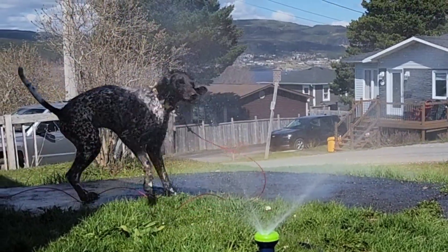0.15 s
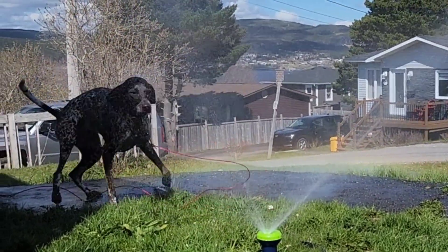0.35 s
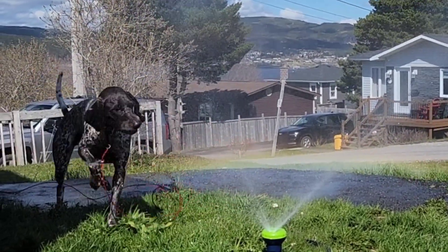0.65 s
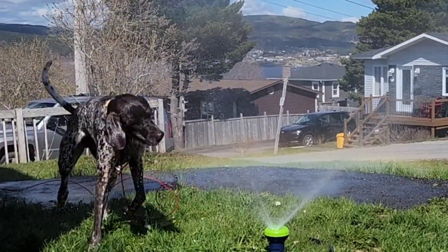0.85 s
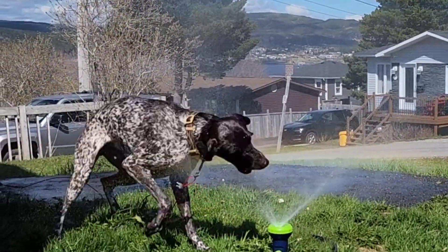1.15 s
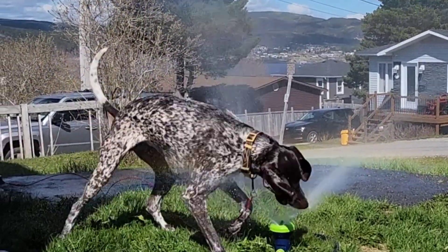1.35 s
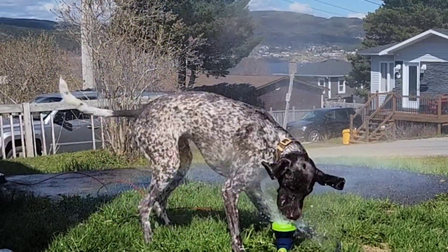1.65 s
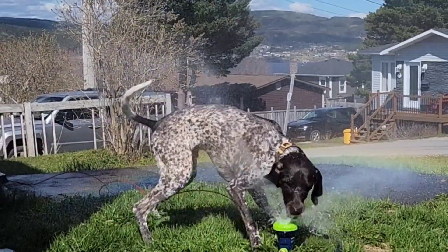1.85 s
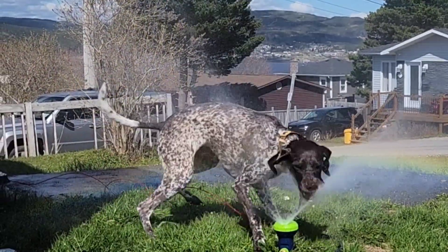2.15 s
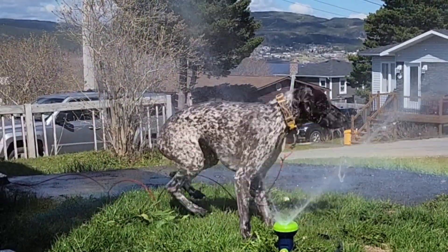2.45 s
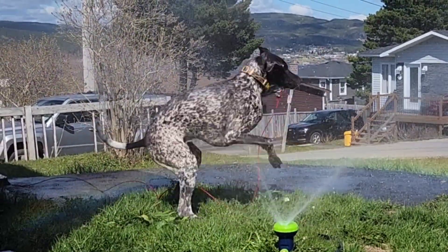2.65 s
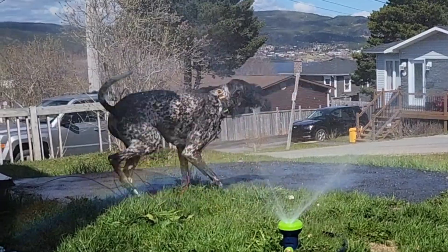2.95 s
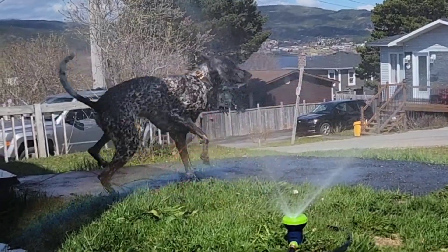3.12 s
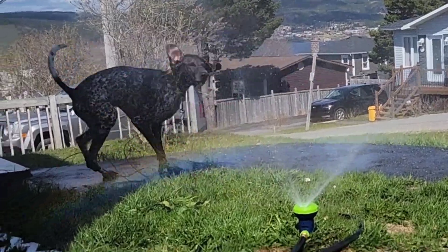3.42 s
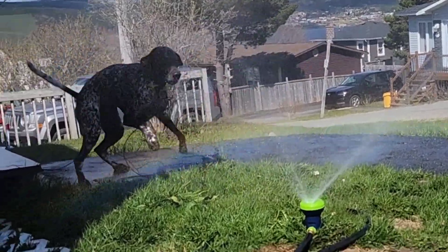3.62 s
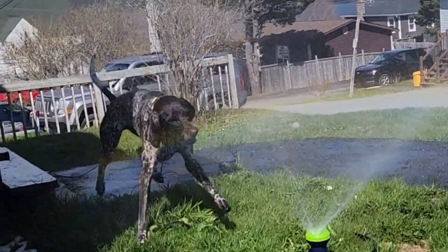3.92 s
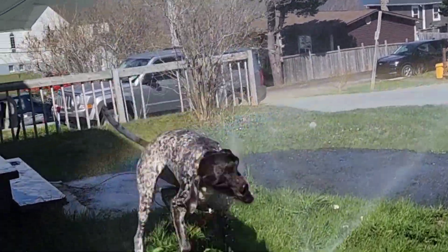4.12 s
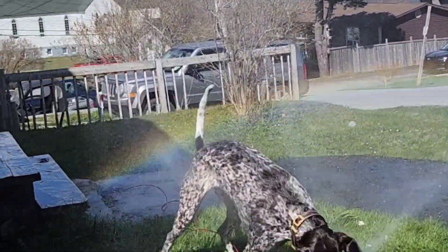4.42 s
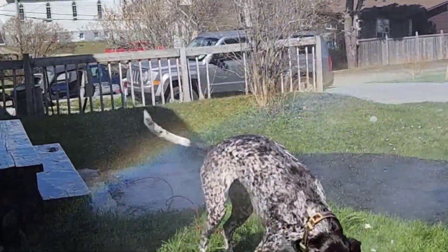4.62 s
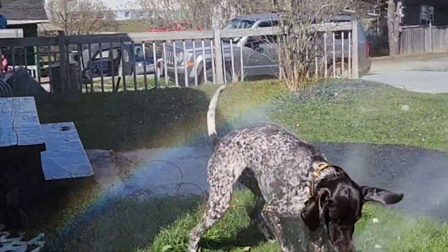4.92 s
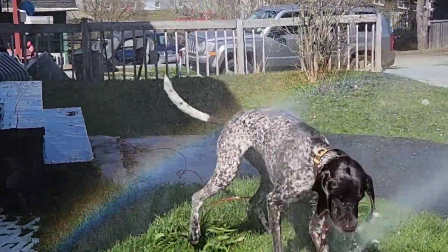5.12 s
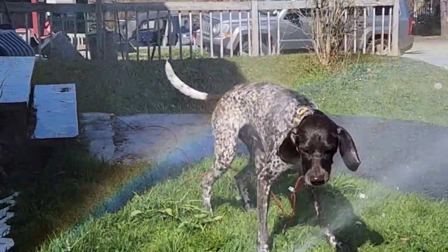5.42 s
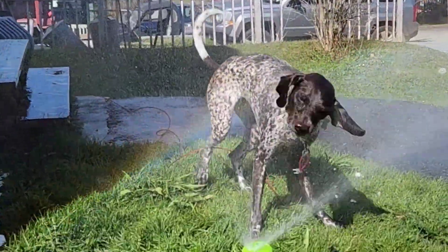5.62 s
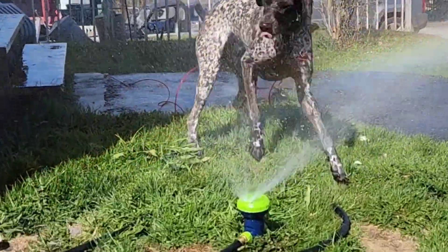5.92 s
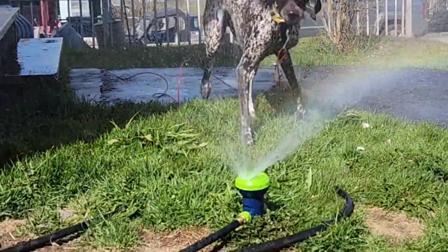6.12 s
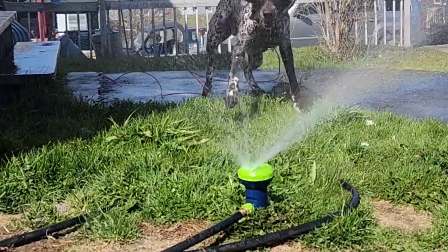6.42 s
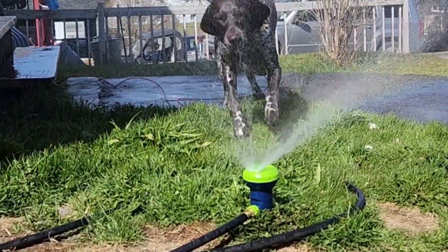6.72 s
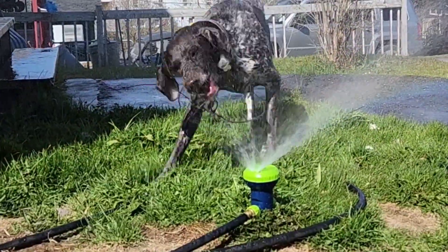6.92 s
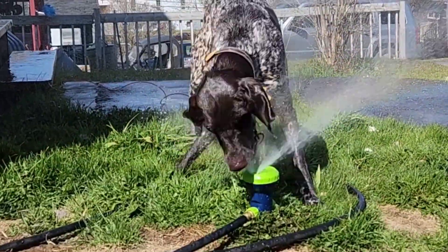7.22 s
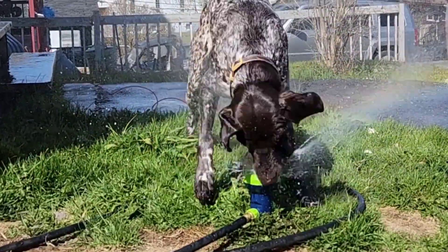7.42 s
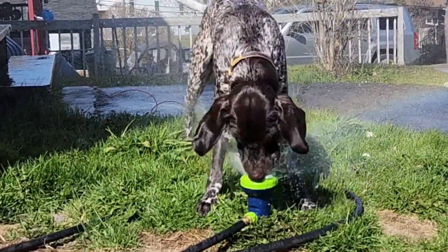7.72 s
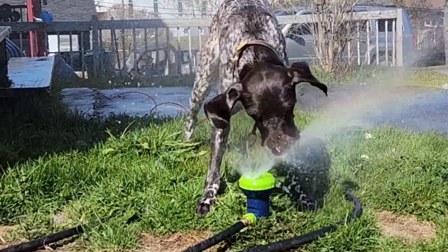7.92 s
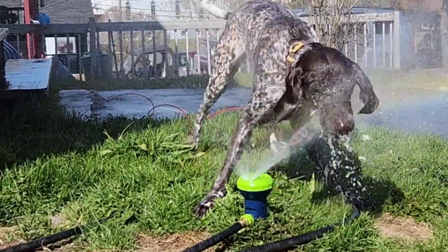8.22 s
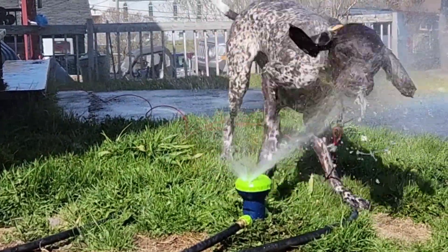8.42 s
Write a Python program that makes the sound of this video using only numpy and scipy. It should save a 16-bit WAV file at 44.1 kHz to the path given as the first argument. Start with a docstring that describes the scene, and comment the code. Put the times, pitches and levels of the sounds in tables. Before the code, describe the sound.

Steady sprinkler spray flares into splatters as a dog snaps and bites at the water, over low gusts of wind.

```python
"""On a lawn, a hand-held camera with two microphone ports stands back from a hissing sprinkler, wind
buffeting the ports. A dog snorts, then chomps at the jet, which splatters on its muzzle and fur.
Around five seconds in the camera turns and comes close, and the short echoes off the ground and the
holding hand shift. A bird chirps once to the left, just before the dog's last bout of wet bites."""
import sys
import numpy as np
from scipy import signal
from scipy.fft import rfft, irfft, next_fast_len
from scipy.io import wavfile
from scipy.ndimage import uniform_filter1d, map_coordinates

SR = 44100
rng = np.random.default_rng(int(sys.argv[2]) if len(sys.argv) > 2 else 0)


def to_wav(s):
    """Save 16-bit WAV."""
    ch = np.atleast_2d(s).T  # columns
    pcm = np.round(np.clip(ch, -1, 1) * 32767)  # PCM
    wavfile.write(sys.argv[1], SR, pcm.astype(np.int16))


N = 377496

# The steady jet. Each row: time in seconds, mist in dB, splatter in dB.
JET = [(0, -35.5, -67), (1.1, -36, -49), (1.32, -35, -44), (1.41, -32.5, -47), (1.8, -32, -42.5),
       (2.2, -34, -45), (2.6, -35.5, -56), (3.6, -36, -48.5), (4.4, -35.5, -44), (5.0, -33.5, -43.5),
       (5.25, -32, -40.5), (5.55, -33, -45.5), (6.1, -33.5, -47), (6.6, -33.5, -46), (7.05, -33, -46.5),
       (7.3, -32.5, -41.5), (7.95, -33.5, -39.5), (8.2, -30, -39.5), (8.56, -31.5, -40)]
# The jet bursts on fur. Each row: peak, rise and fall in seconds, mist in dB, splatter in dB.
SPURTS = [(0.74, 0.033, 0.077, -41, -43), (1.55, 0.11, 0.06, -38, -46), (1.69, 0.025, 0.055, -27.5, -43),
          (1.86, 0.01, 0.013, -30, -44), (2.075, 0.043, 0.028, -28, -39), (2.22, .03, 0.029, -53, -43.5),
          (2.36, 0.023, 0.1, -44, -42.5), (3.36, 0.11, 0.098, -47, -40), (4.11, 0.031, 0.018, -47, -40),
          (4.51, 0.041, 0.058, -35, -49), (4.68, 0.015, 0.021, -31, -37), (4.732, 0.012, 0.016, -30, -36),
          (4.77, 0.046, 0.083, -29, -35.5), (6.25, 0.075, 0.013, -57, -42), (7.15, .03, 0.082, -36, -36),
          (7.41, 0.053, 0.016, -31.5, -38.5), (7.58, 0.11, 0.074, -28.5, -34.5),
          (7.75, 0.017, 0.018, -47, -35.5), (7.83, 0.049, 0.074, -30.5, -34.5),
          (8.34, 0.015, 0.06, -39, -50)]
# The camera's path. Each row: time in seconds, nearness 0-1, then the ground echo's delay in ms
# and its strength, for the left port and for the right.
CAMERA = [(0, 0, 2.18, .28, 2.16, .25), (3.2, 0, 2.18, .28, 2.16, .25), (3.6, .05, 2.25, .2, 2.0, .3),
          (4.6, .2, 1.6, .12, 1.35, .3), (5.1, .3, 1.3, .1, 1.14, .2), (5.3, .92, 1.14, .12, 1.1, .2),
          (5.6, .95, 1.05, .15, 1.15, .2), (5.8, .95, 1.02, .2, 1.44, .45), (6.4, .95, .8, -.2, 1.35, .3),
          (8.56, .95, .8, -.25, 1.41, .35)]


def mist():
    """Fine mist hisses from the nozzle and flares as the jet bursts on the dog."""
    # Colour at each port, from afar and close up. Each row: frequency in Hz, relative level in dB.
    far_left = [(1300, -10), (2200, -7), (3200, -1), (4500, 5), (5300, -1.5), (6300, 1), (6900, 1),
                (7400, 4.5), (8000, 1), (8600, 2.5), (9600, 0.8), (11000, -0.5), (12200, -0.5),
                (13200, -0.5), (14200, -2), (15500, 0)]
    far_right = [(1300, -4.5), (2200, -9.5), (3200, -8.5), (4500, 1), (5300, 0), (6500, 0), (7600, 5),
                 (8600, -5), (9600, -6), (11000, -4), (12200, 0), (13200, -8), (14200, -3), (15500, -4)]
    near_left = [(1000, -12.5), (1900, -4.5), (2400, 5), (3200, -4), (4500, 3), (5300, -0.5), (6500, 7.5),
                 (7600, 4.5), (8600, 4), (9600, 2.5), (11000, 3.5), (11900, 5), (12600, 9), (13600, 3),
                 (14200, 5), (15500, 3.5)]
    near_right = [(1000, -5), (1500, -9), (2000, -22), (2500, -2), (3200, -1.5), (4500, 5), (5300, 3.5),
                  (6500, 0), (7600, 6.5), (8600, 0), (9600, -7), (11000, -6), (12200, 1.5), (13200, -8),
                  (14200, -4), (15500, -3)]

    def colour(hz, near):
        return np.array([(1 - near) * along([(500, -27)] + far, hz)
                         + near * along([(500, -22)] + close, hz)
                         for far, close in ((far_left, near_left), (far_right, near_right))])

    gain = bursts(curves(JET)[0], [row[:4] for row in SPURTS])
    hiss = water_at_ports(colour, depth_db=1.23, rate=900, patchy_db=1.36)
    return hiss * gain * amp(.62 * wobble(5.3))


def splatter():
    """Coarse drops hit fur, lower than the mist and leaning left as the camera nears."""
    # Each row: frequency in Hz, relative level in dB.
    spectrum = [(1100, -57), (1600, -6.5), (2300, 4), (3500, 7), (5500, 0.5), (9000, -47)]
    colour = lambda hz, near: along(spectrum, hz) + np.array([1.6 * near, -2.5 * near])[:, None]
    gain = bursts(curves(JET)[1] + 1.5 * wobble(14), [(*row[:3], row[4]) for row in SPURTS])
    return water_at_ports(colour, depth_db=2.8, rate=350, patchy_db=2.2) * gain


def patter():
    """The rest of the water falls softly on the grass."""
    # Each row: time in seconds, level in dB.
    levels = [(0.0, -51.5), (0.86, -46), (1.3, -47.5), (1.98, -43.5), (2.8, -49), (3.2, -47.5),
              (3.43, -43.5), (3.72, -49.5), (5.2, -48.5), (6.5, -48.5), (7.02, -47), (7.18, -39.5),
              (7.37, -44.5), (8.3, -45), (8.56, -46)]
    # Drops on grass, from afar and close up. Each row: frequency in Hz, relative level in dB.
    grass_far = [(120, -30), (200, -12.5), (640, -4.5), (807, -7.5), (1010, -8), (1180, -13.5), (1490, -8),
                 (2500, -44), (3250, -54), (5500, -120)]
    grass_near = [(120, -22), (200, -10.5), (540, -5.5), (780, -1), (990, -16.5), (1200, -0.5), (2000, -4),
                  (2800, -40)]
    colour = lambda hz, near: (1 - near) * along(grass_far, hz) + near * along(grass_near, hz)
    gain = amp(curves(levels)[0] + 1.07 * wobble(9))
    return water_at_ports(colour, depth_db=2, rate=150, patchy_db=1) * gain


def snorts():
    """Air blasts through the dog's nose and throat, then drops to a weaker tail."""
    # Each row: start, blast and tail in seconds, level in dB, left over right in dB.
    breaths = [(0.703, 0.056, 0.06, -32.5, -3), (3.22, .14, .1, -44.5, -11), (6.205, 0.0093, .02, -39, 2)]
    # One set of resonances a snort. Each row: centre in Hz, width in Hz, level in dB.
    snouts = [
        [(1060, 80, 0.5), (1675, 220, 2.5), (2160, 160, 1), (2710, 170, -3), (3430, 240, -14), (615, 220, -13)],
        [(517, 300, -6), (1010, 460, 0), (1700, 970, -3.5), (2520, 340, 4), (3550, 1200, -8)],
        [(710, 190, -3.5), (1700, 640, -5), (2600, 730, -14)],
    ]
    attack_s, drop_s, release_s = .013, .006, .06
    out = np.zeros((2, N))
    for (s, blast, tail, db, pan_db), snout in zip(breaths, snouts):
        times = s + np.cumsum([0, attack_s, blast, drop_s, tail, release_s])
        envelope = list(zip(times, db - np.array([30, 0, 0, 6, 10.5, 30])))
        air = unit(filtered(drops(1.9, 180), resonances(snout)))
        side = .4 * unit(filtered(drops(3.7, 210), resonances(snout)))
        pair = np.array([air + side, np.roll(air, 4) - side])
        out += panned(pair * amp(curves(envelope)[0]) * gate(envelope), pan_db)
    return out


def gargles():
    """The jet sounds the open mouth; the spray shakes the tone's strength and pitch."""
    # Each row: peak, rise and fall in seconds, level in dB, cavity pitch in Hz.
    mouthfuls = [(4.21, 0.1, 0.1, -51, 840), (4.58, 0.07, 0.058, -46.5, 779), (7.24, 0.07, 0.08, -41, 850),
                 (7.51, 0.055, 0.035, -39, 820)]
    closing = .2  # share of the pitch lost with the mouth nearly shut
    out = np.zeros(N)
    for s, rise, fall, db, hz in mouthfuls:
        shake = .2 + 1.4 * wobble(150)
        opening = swell(s, rise, fall)
        pitch = hz * (1 - closing * (1 - opening)) + 60 * wobble(60)
        out += shake * np.sin(phase(pitch)) * amp(db) * opening
    return out


def chomps():
    """Each wet bite is a squelch that rings the mouth and, more faintly, the muzzle."""
    # Each row: start in seconds, peak in dB, mouth resonance in Hz, left over right in dB.
    bites = [(1.612, -31.5, 700, 5), (1.637, -32, 810, 0), (1.841, -29.5, 674, 0), (1.858, -32.5, 800, 8),
             (1.98, -32, 516, 5), (2.003, -39, 600, 3), (2.081, -46, 630, -1), (2.349, -34, 430, 3),
             (2.363, -35, 480, 3), (2.382, -33, 470, 3), (2.981, -41, 624, -5), (4.326, -35.5, 680, 3),
             (4.54, -38.5, 680, 0), (4.712, -38.5, 480, 0), (5.776, -35, 780, 0), (7.216, -32, 776, 4),
             (7.781, -29.5, 370, 4), (8.02, -37, 656, 1)]
    # The muzzle's resonances. Each row: centre in Hz, width in Hz, relative level in dB.
    muzzle = [(1550, 300, 6), (2400, 500, -6)]
    fall_s = .058  # to die by 30 dB
    out, t = np.zeros((2, N)), np.arange(SR // 6) / SR
    for s, db, hz, pan_db in bites:
        squelch = rng.standard_normal(len(t)) * (1 - np.exp(-t / .003)) * amp(-30 * t / fall_s)
        mouth = resonances([(hz, .95 * hz, 0)])
        wet = filtered(squelch, lambda f: mouth(f) ** 2 + amp(-17) * resonances(muzzle)(f))
        add_at(out, s, panned(wet / np.abs(wet).max() * amp(db), pan_db))
    return out


def ticks():
    """Teeth and drops click sharply: four partials and noise through one broad resonance."""
    # Each row: start in seconds, peak in dB, resonance in Hz, left over right in dB.
    clicks = [(0.393, -42, 1900, -1), (3.82, -31, 2700, -5), (4.0935, -25, 2000, -3), (4.919, -33, 2000, 0),
              (8.4565, -21, 2400, 5)]
    fall_s = .011  # to die by 60 dB
    out, t = np.zeros((2, N)), np.arange(SR // 6) / SR
    for s, db, hz, pan_db in clicks:
        partials = sum(np.sin(2 * np.pi * k * hz * t) for k in (.25, .55, 1, 1.6))
        envelope = (1 - np.exp(-t / .001)) * amp(-60 * t / fall_s)
        crack = (partials + 1.2 * rng.standard_normal(len(t))) * envelope
        tick = filtered(crack, resonances([(hz, 1.3 * hz, 0)]))
        add_at(out, s, panned(tick / np.abs(tick).max() * amp(db), pan_db))
    return out


def pops():
    """Wet pops in the mouth and on the muzzle ring briefly, reaching the right port a little later."""
    # Each row: start in seconds, peak in dB, pitch in Hz, length in cycles, left over right in dB.
    rings = [(1.609, -24.5, 426, 2, 2), (1.616, -30, 930, 7.3, -1), (1.627, -37, 810, 5, 11),
             (1.809, -35, 625, 8.3, 0), (1.858, -35, 700, 6, 4), (1.883, -35, 660, 7, 0),
             (1.977, -31, 660, 2.7, 0), (1.978, -31, 1520, 8.4, 0), (1.985, -31.5, 1560, 13, -2),
             (1.987, -39, 790, 5, 0), (2.095, -30.5, 410, 3, 2), (2.127, -37, 471, 4, 1),
             (7.134, -34, 2300, 9, 5), (7.152, -36, 1830, 13, 3), (7.156, -30, 2730, 11, 1),
             (7.178, -36, 2300, 12, 3), (7.227, -33.5, 2150, 19, 8), (7.343, -39, 2750, 9.1, 1.5),
             (7.557, -29, 4240, 14, 1), (7.726, -35, 2500, 28, 4), (7.741, -29, 2340, 12, 3),
             (7.751, -34, 2000, 13, 3), (7.81, -25, 3730, 13, 0), (7.831, -26, 3580, 12, 2)]
    out = np.zeros((2, N))
    for s, db, hz, cycles, pan_db in rings:
        turns = np.arange(round(cycles / hz * SR)) * hz / SR
        envelope = amp(db) * np.sin(np.pi * (turns / cycles) ** .76)
        glide = 1 + .025 * rng.standard_normal() * turns / cycles
        left, right = panned(envelope * np.sin(2 * np.pi * turns * glide), pan_db)
        add_at(out[0], s, left)
        add_at(out[1], s + 3 / SR, right)
    return out


def wind():
    """Eddies at the ports: a deep rumble, mostly shared, and a lighter flap that differs more."""
    # Each row: time in seconds, rumble in dB, flap in dB.
    breeze = [(0, -46, -45.5), (.7, -43.5, -54), (1.5, -45.5, -55), (2.0, -39.5, -58), (2.6, -39.5, -50.5),
              (3.2, -44.5, -61), (3.9, -41, -65), (4.5, -44.5, -56.5), (5.3, -38.5, -50.5),
              (6.2, -44, -52.5), (7.2, -42.5, -59.5), (7.7, -46, -50.5), (8.56, -41.5, -47)]
    # Each row: peak and width in seconds, rumble in dB, flap in dB.
    gusts = [(0.05, 0.059, -38, -38.5), (0.19, 0.049, -37, -43.5), (0.45, 0.11, -39, -61),
             (0.98, 0.037, -42, -41.5), (1.15, 0.063, -39, -45), (1.58, 0.046, -54, -38),
             (1.79, 0.084, -42.5, -39.5), (1.96, 0.064, -38.5, -42), (2.1, 0.037, -43, -43),
             (2.39, 0.057, -38, -44.5), (2.7, 0.034, -36, -43), (2.86, 0.029, -41, -47),
             (3.43, .05, -44, -60), (3.68, 0.026, -38, -46.5), (4.22, 0.038, -39, -45.5),
             (4.63, 0.084, -38.5, -71), (5.43, 0.018, -51, -44), (5.6, 0.025, -34, -65),
             (6.09, 0.075, -36, -43.5), (6.29, 0.042, -44, -43), (6.75, 0.031, -40, -46.5),
             (7.87, 0.042, -51, -33.5), (8.22, 0.035, -57, -51), (8.46, .015, -37, -51)]
    # The two spectra. Each row: frequency in Hz, relative level in dB.
    rumble = [(12, -40), (20, -10), (30, 4), (42, -3), (59, 3.5), (106, -4), (200, -21), (260, -62),
              (440, -120)]
    flap = [(70, -6.5), (130, 2), (200, -2.5), (330, -8), (600, -27)]
    # Random wander in dB of the rumble, then the flap.
    unrest_db = (0.5, 6)
    out = 0
    for k, (level_db, spectrum, apart) in enumerate(zip(curves(breeze), (rumble, flap), (.33, .55))):
        eddies = np.array([drops(1.76, 25), drops(5, 29)])
        mid, side = filtered(eddies, lambda hz: amp(along(spectrum, hz)))
        slaps = [(s, width, width, db[k]) for s, width, *db in gusts]
        gain = bursts(level_db + unrest_db[k] * wobble(14), slaps)
        out = out + gain * unit(np.array([mid + apart * side, mid - apart * side]))
    return out


def jolts():
    """Each dull jolt rings the camera body for a few low cycles."""
    # Each row: start in seconds, strength in dB, pitch in Hz.
    knocks = [(0.24, -17.5, 40.3), (0.29, -14, 51), (0.609, -21, 82), (0.966, -5.5, 84), (1.002, -15, 44.2),
              (1.637, -17, 65.3), (1.92, -18, 64), (2.078, -18, 68), (2.33, -18, 82), (2.388, -23, 79),
              (2.671, -21, 92), (2.856, -16, 44.7), (3.665, -14, 65.6), (3.981, -22, 55),
              (4.249, -18.5, 61.9), (4.572, -19.5, 58.6), (4.71, -18, 62), (4.906, -19, 45.7),
              (5.299, -21, 72), (6.244, -20.5, 83), (6.899, -19.5, 47.3), (7.43, -22, 48.4),
              (8.224, -18.5, 280)]
    ring_cycles = 6.8  # to die by 60 dB
    out, t = np.zeros(N), np.arange(SR // 4) / SR
    for s, db, hz in knocks:
        envelope = amp(db - 60 * t * hz / ring_cycles) * (1 - np.exp(-1.2 * t * hz))
        add_at(out, s, -envelope * np.sin(2 * np.pi * hz * t))
    return out


def flutter():
    """One low flutter on the left beats in lopsided puffs, slows, swells and stops."""
    # Each row: time in seconds, beat rate in Hz, level in dB.
    beats = [(7.8, 201.7, -48), (7.82, 176.6, -33.5), (7.845, 113.3, -31), (7.868, 77.6, -31),
             (7.89, 80, -20), (7.915, 81.6, -23), (7.925, 78, -55)]
    hz, db = curves(beats)
    angle = phase(hz * amp(.83 * wobble(60)))
    puffs = np.sin(angle) + .24 * np.cos(2 * angle) + .2 * np.sin(3 * angle)
    return panned(puffs * amp(db) * gate(beats), pan_db=8.7)


def bird():
    """One arched whistle, off to the left."""
    # Each row: time in seconds, pitch in Hz, level in dB.
    arch = [(6.888, 3080, -57), (6.91, 3240, -47), (6.938, 3280, -39.5), (6.955, 3130, -45),
            (6.972, 3170, -59)]
    hz, db = curves(arch)
    whistle = np.sqrt(2) * np.sin(phase(hz + 25 * wobble(120)))
    return panned(whistle * amp(db + 1.5 * wobble(80)) * gate(arch), pan_db=17)


def water_at_ports(colour, depth_db, rate, patchy_db):
    """Drop noise as the moving ports hear it, at unit RMS; colour(hz, nearness) shapes it in dB."""
    frame = 1024
    hz, t, spectra = signal.stft(np.array([drops(depth_db, rate) for _ in range(3)]), SR, nperseg=frame)
    hz = hz[:, None]
    patches = uniform_filter1d(rng.standard_normal(spectra.shape[1:]), 40, axis=0)
    patches = unit(uniform_filter1d(patches, 6, axis=1))
    spectra = spectra * amp(patchy_db * patches)  # the fan of water tears and closes, band by band
    near = curves(CAMERA, t)[0]
    pair = port_pair(spectra, hz, t, near) * echoes(hz, t) * gliding_bands(hz, t) * amp(colour(hz, near))
    return unit(signal.istft(pair, SR, nperseg=frame)[1][:, :N])


def port_pair(spectra, hz, t, near):
    """Both ports share one noise, which lags on the right; each adds a diffuse noise of its own."""
    # Each row: frequency in Hz, likeness of the ports 0-1.
    likeness = [(300, 1), (900, 1), (1600, 0.5), (2300, 0.5), (3200, 0.62), (4500, 0.5), (5500, 0.04)]
    # The left port's lead, from afar and close up. Each row: frequency in Hz, lead in radians.
    lead_far = [(300, 0.24), (1000, 1.25), (1700, 2.15), (3300, 3.3), (4600, 6.1), (6000, 9)]
    lead_near = [(300, 0.087), (900, 1.44), (1500, 2.33), (2800, 2.12), (3500, 4.47), (5000, 4.04),
                 (6500, 4.9)]
    # The ports are near opposite phase up to an edge; higher up, two late paths reach the right one.
    # Each row: time in seconds, edge in Hz, first and second delay in ms, likeness 0-1.
    paths = [(0, 3300, .5, 2.4, .45), (3.1, 3300, .5, 2.35, .5), (4.1, 3400, .25, 2.1, .3),
             (4.75, 4600, .25, 2.0, .55), (5.15, 3400, .55, 1.9, .55), (5.4, 5200, .6, 1.8, .6),
             (6.1, 6100, .62, 1.55, .6), (6.35, 3700, .68, 1.6, .65), (7.0, 3700, .8, 1.75, .65),
             (7.6, 3700, .8, 1.7, .45), (8.56, 3500, .65, 1.4, .5)]
    opposed_hz, late_hz = 3156, 5270  # start of opposite phase; lowest start of the late paths
    edge_hz, first_ms, second_ms, late_alike = curves(paths, t)
    held_hz = hz - np.clip(hz - opposed_hz, 0, np.abs(edge_hz - opposed_hz))  # stands still to the edge
    late = np.clip((hz - np.maximum(late_hz, edge_hz + 300)) / 600, 0, 1)
    alike = np.clip((1 - late) * along(likeness, held_hz) + late * late_alike, 0, 1)
    lead = (1 - near) * np.interp(held_hz, *np.transpose(lead_far))
    lead += near * np.interp(held_hz, *np.transpose(lead_near))
    late_paths = delay(hz, first_ms) + delay(hz, second_ms)
    lag = np.sqrt(1 - late) * np.exp(-1j * lead) + np.sqrt(late / 2) * late_paths
    shared, diffuse = spectra[0], spectra[1:]
    return np.sqrt(alike) * np.array([shared, shared * lag]) + np.sqrt(1 - alike) * diffuse


def echoes(hz, t):
    """The ground reflects into both ports; the holding hand and the camera's shell into the left."""
    # The hand drifts off and sweeps back. Each row: time in seconds, delay in ms, strength.
    hand = [(0, .15, .25), (3.5, .15, .25), (3.9, .135, .25), (4.5, .165, .3), (4.85, .175, .15),
            (5.0, .24, .1), (5.09, .215, .5), (5.17, .175, .6), (5.21, .14, .55), (5.26, .1, .4),
            (5.4, .1, .15), (8.56, .1, .12)]
    # Each row: delay in ms, strength.
    shell = [(.72, 0.048), (.94, 0.049)]
    _, left_ms, left_echo, right_ms, right_echo = curves(CAMERA, t)
    hand_ms, hand_echo = curves(hand, t)
    low = np.exp(-hz / 1500)
    turf = (1 + .023 * low) * np.exp(2.6j * low)  # soft ground favours low tones and turns their phase
    left = 1 + left_echo * turf * delay(hz, left_ms)
    left *= 1 + hand_echo * delay(hz, hand_ms)
    left *= 1 + sum(strength * delay(hz, ms) for ms, strength in shell)
    right = 1 + right_echo * turf * np.exp(-hz / 9000) * delay(hz, right_ms)
    return np.array([left, right])


def gliding_bands(hz, t):
    """Hollow and whistling bands glide through the spray as the camera turns and nears the turf."""
    # Each row: time in seconds, then centre in Hz and depth in dB of a hollow at both ports
    # and of one at the left only.
    hollows = [(0, 1290, 0, 4400, 3.5), (1.5, 1250, 6, 4400, 2), (2.4, 1230, 4, 4370, 3),
               (3.05, 1300, 2.5, 4370, 0.5), (3.3, 1490, 5, 4430, 7), (4.2, 1860, -6, 4230, 5),
               (4.75, 2000, -4.5, 3800, 1), (4.97, 1500, -5, 2000, 3), (5.08, 1350, -5, 2400, 9),
               (5.16, 1200, -7, 3200, 12), (5.21, 1100, -3, 4100, 9), (5.3, 1050, -5, 5300, 4),
               (5.5, 1100, 0, 5200, 5), (5.75, 1170, 2, 5100, 4), (6.1, 1150, 5, 5500, 2),
               (6.3, 1340, 5.5, 4700, -1), (7, 1400, 11.5, 4730, 4), (7.6, 1410, 14.5, 4800, 4),
               (8.56, 1420, 5.5, 5230, 9)]
    # A whistle, strongest on the left. Each row: time in seconds, Hz, lift in dB, relative width.
    ridge = [(3.9, 7600, -1, .06), (4.2, 7500, 2, 0.051), (4.55, 7360, 4.5, .06), (4.66, 7200, 7.5, .09),
             (4.74, 6850, 11, 0.15), (4.84, 6400, 4, .2), (4.95, 6800, 0, .1), (5.07, 7230, 8, 0.054),
             (5.14, 6200, 6, .06), (5.32, 6400, 8, .05), (5.5, 6500, 3.5, 0.054), (5.75, 6600, 1, .07),
             (6.05, 7600, 6.5, .07), (6.3, 8200, 3, 0.063), (6.55, 8500, 2, .07), (6.9, 8500, -2, .07)]
    # Each row: time in seconds, dark band in Hz, its depth in dB, gain above about 12 kHz in dB.
    right_treble = [(0, 9900, 19, -5), (1.3, 9900, 12, 0), (1.65, 10000, 10, -2), (2.4, 9800, 12, -2),
                    (3.4, 10000, 9, -2), (4.1, 10200, 10, 4), (4.75, 9800, -1, 0.5), (5.3, 9300, 3, 5),
                    (6.0, 9200, 9, 1), (6.8, 9600, 11, 0), (7.5, 8950, 22, 0), (8.56, 8900, 15.5, 0)]
    both_hz, both_db, left_hz, left_db = curves(hollows, t)
    ridge_hz, ridge_db, ridge_width = curves(ridge, t)
    dark_hz, dark_db, top_db = curves(right_treble, t)
    band = lambda centre_hz, db, width: amp(db * np.exp(-((hz / centre_hz - 1) / width) ** 2))
    flicker = uniform_filter1d(rng.standard_normal(len(t)), size=3)
    whistle = band(ridge_hz, ridge_db * (1 + .3 * flicker), ridge_width)
    shelf = amp(top_db * np.clip(hz / 1500 - 7.5, 0, 1))
    left = whistle * band(left_hz, -left_db, .14)
    right = np.sqrt(whistle) * band(dark_hz, -dark_db, .096) * shelf
    return np.array([left, right]) * band(both_hz, -both_db, .14)


def amp(db):
    return 10 ** (np.asarray(db) / 20)


def unit(x):
    return x / np.sqrt(np.mean(x ** 2) + 1e-20)


def phase(hz):
    return 2 * np.pi * np.cumsum(hz) / SR


def delay(hz, ms):
    return np.exp(-2j * np.pi * hz * ms / 1000)


def panned(x, pan_db):
    return x * amp([[pan_db / 2], [-pan_db / 2]])


def add_at(out, s, x):
    span = out[..., round(s * SR):][..., :x.shape[-1]]
    span += x[..., :span.shape[-1]]


def along(points, hz):
    """Interpolate (Hz, value) points on a log axis."""
    f, v = np.transpose(points)
    return np.interp(np.log(hz + 1), np.log(f + 1), v)


def curves(rows, t=None):
    """One value per sample (or per given time) for each column after the time."""
    s, *cols = np.transpose(rows)
    return [np.interp(np.arange(N) / SR if t is None else t, s, c) for c in cols]


def gate(rows):
    """1 while a table lasts, with soft edges."""
    t0, t1 = rows[0][0], rows[-1][0]
    return np.interp(np.arange(N) / SR, [t0 - .01, t0 + .01, t1 - .01, t1 + .01], [0, 1, 1, 0])


def wobble(rate):
    """A random curve, rate knots a second."""
    knots = rng.standard_normal(int(N * rate / SR) + 4)
    return map_coordinates(knots, [np.arange(N) * rate / SR], order=1)


def drops(depth_db, rate):
    """Noise whose level jumps rate times a second."""
    return unit(rng.standard_normal(N) * amp(depth_db * wobble(rate)))


def swell(s, rise, fall):
    """A bell of gain 1 at time s with its own rise and fall."""
    out = np.zeros(N)
    span = np.arange(max(0, int((s - 5 * rise) * SR)), min(N, int((s + 5 * fall) * SR)))
    t = span / SR - s
    out[span] = np.exp(-.5 * (t / np.where(t < 0, rise, fall)) ** 2)
    return out


def bursts(steady_db, events):
    """Gain of a steady level with swells added in power."""
    power = sum((amp(db) * swell(s, rise, fall)) ** 2 for s, rise, fall, db in events)
    return np.sqrt(amp(steady_db) ** 2 + power)


def filtered(x, response):
    """x through a complex response of frequency."""
    size = next_fast_len(x.shape[-1] + 4096)
    return irfft(rfft(x, size) * response(np.fft.rfftfreq(size, 1 / SR)), size)[..., :x.shape[-1]]


def resonances(modes):
    """Causal response of (Hz, width, dB) resonances."""
    return lambda f: sum((-1) ** k * amp(db) * 1j * f * width / (hz * hz - f * f + 1j * f * width)
                         for k, (hz, width, db) in enumerate(modes))


def scene():
    sprinkler = mist() + splatter() + patter()
    dog = snorts() + gargles() + chomps() + ticks() + pops()
    return sprinkler + dog + wind() + jolts() + flutter() + bird()


def record(dry):
    """The camera keeps nothing above its band limit."""
    return filtered(dry, lambda hz: hz < 15890)


dry = scene()
out = record(dry)
to_wav(out)
```